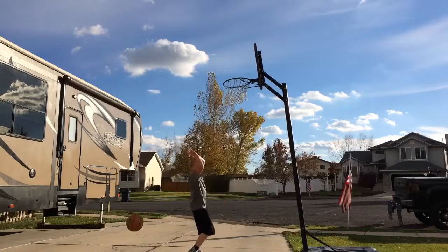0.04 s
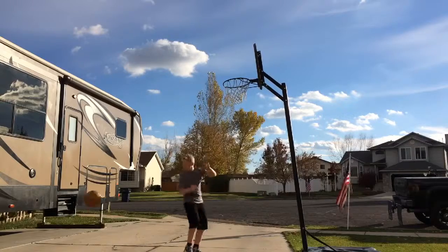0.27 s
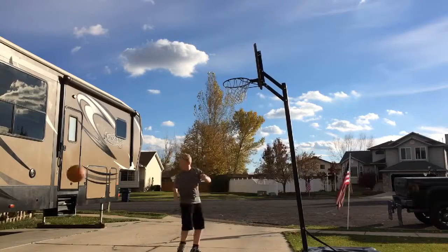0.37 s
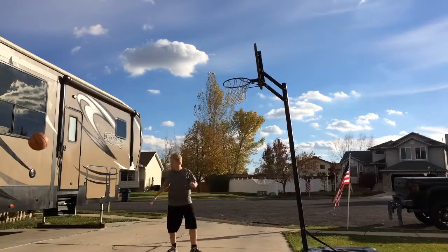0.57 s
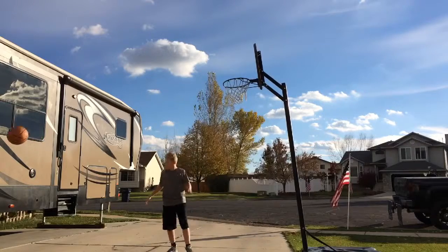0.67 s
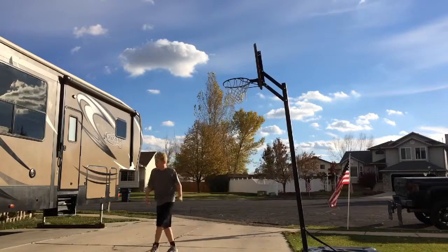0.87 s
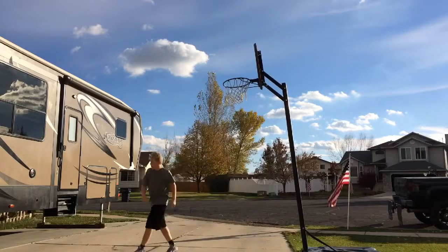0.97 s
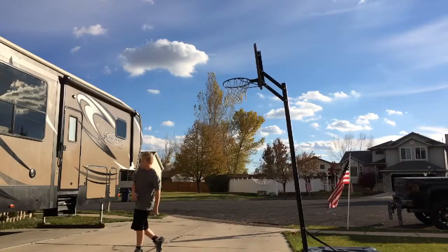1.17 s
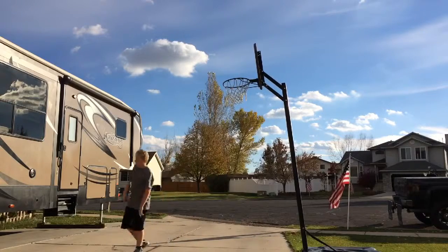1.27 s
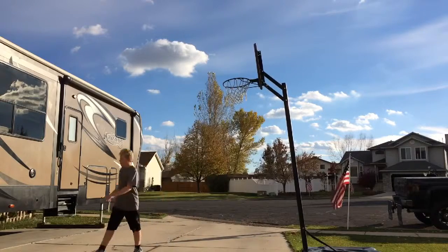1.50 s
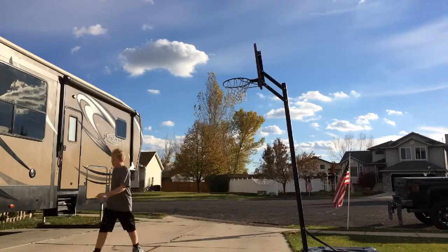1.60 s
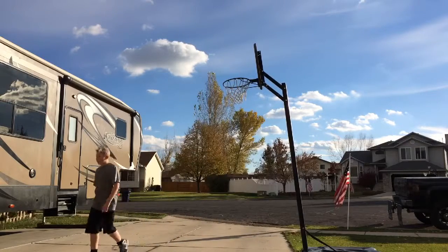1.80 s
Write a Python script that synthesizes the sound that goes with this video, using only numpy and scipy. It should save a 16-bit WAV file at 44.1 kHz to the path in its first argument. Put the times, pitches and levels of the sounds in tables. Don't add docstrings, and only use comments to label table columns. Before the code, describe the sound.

Two sharp, ringing basketball bounces on concrete with street echoes, then a hollow trailer panel rattle

```python
import sys
import numpy as np
from scipy import signal
from scipy.io import wavfile

SR = 44100
rng = np.random.default_rng(int(sys.argv[2]) if len(sys.argv) > 2 else 0)


def to_wav(s):
    ch = np.atleast_2d(s).T
    pcm = np.round(np.clip(ch, -1, 1) * 32767)
    wavfile.write(sys.argv[1], SR, pcm.astype(np.int16))


def how_loud(loudness_db):
    steps = np.asarray(loudness_db, float) / 20
    return 10 ** steps


N = 81585
TIME = np.arange(N) / SR
BANDS_HZ = 24 * 2 ** np.arange(0, 9.4, 1 / 3)


def rms_one(x):
    return x / np.sqrt(np.mean(x ** 2) + 1e-20)


def at_hz(points, hz):
    table = np.array(points)
    return np.interp(np.log(hz), np.log(table[:, 0]), table[:, 1])


def drift(rate_hz):
    r = np.exp(-2 * np.pi * rate_hz / SR)
    noise = rng.standard_normal(N + SR // 4)
    return rms_one(signal.lfilter([1], [1, -2 * r, r * r], noise)[-N:])


def ring(clicks, hz, t60_s):
    r = how_loud(-60 / (t60_s * SR))
    w = 2 * np.pi * hz / SR
    return signal.lfilter([0, np.sin(w)], [1, -2 * r * np.cos(w), r * r], clicks + 1e-18)


def bands(spectrum):
    white = rng.standard_normal((2, N + SR // 2))
    edge = 2 ** (1 / 6)
    rows = []
    for k, hz in enumerate(BANDS_HZ):
        band = signal.butter(2, [hz / edge, hz * edge], "band", fs=SR, output="sos")
        rows.append(how_loud(at_hz(spectrum, hz)) * signal.sosfilt(band, white[k % 2])[-N:])
    out = np.array(rows)
    return out / np.sqrt(np.mean(out.sum(axis=0) ** 2))


def dying(start_s, t60_s):
    return (TIME >= start_s) * how_loud(-60 * np.maximum(TIME - start_s, 0) / t60_s)


def tilt(db_per_octave):
    return how_loud(db_per_octave * np.log2(BANDS_HZ / 4000))[:, None]


def later(x, lag_s):
    return np.interp(TIME - lag_s, TIME, x, left=0)


def clumps():
    flicker = np.repeat([drift(90) for octave in range(10)], repeats=3, axis=0)
    return how_loud(1.6 * flicker[:len(BANDS_HZ)])


def ball():
    # start_s, level_db, thump_hz, trailer_echo_lag_s, trailer_echo_db
    bounces = [
        (.20896, -6.5, 113.1, .0075, 0),
        (1.35044, -8, 127.4, .00675, -2),
    ]
    # pitch_hz, level_db per Hz
    puff_color = [(180, -30), (300, -7), (1110, -23), (1420, -14.5), (2980, -19.5), (7250, -17),
                  (13100, -25.5), (15500, -18)]
    # pitch_hz, level_db per Hz
    scatter_color = [(29, -33), (50, -1), (116, -3), (565, -14.5), (913, -25.5), (1190, -16.5), (1410, -19),
                     (5930, -28), (15500, -43.5)]
    far_wall_lag_s = (.3670, .4432)
    puff = bands(puff_color).sum(axis=0)
    scatter = bands(scatter_color) * clumps()
    wall_band = signal.butter(2, (400, 2200), "band", fs=SR, output="sos")
    echo_cut = signal.butter(1, 177, "high", fs=SR)
    out = np.zeros(N)
    for k, (start_s, level_db, thump_hz, lag_s, echo_db) in enumerate(bounces):
        slap = ball_slap(start_s)
        body = how_loud(level_db) * ball_body(k, start_s, thump_hz, puff)
        trailer_echo = how_loud(echo_db) * later(signal.lfilter(*echo_cut, body), lag_s)
        out += slap + body + trailer_echo + house_echoes(body)
        out += how_loud(level_db) * street_scatter(start_s, scatter)
        far_sound = later(slap + how_loud(5) * body, far_wall_lag_s[k])
        out += how_loud(-31) * signal.sosfilt(wall_band, far_sound)
    return out


def ball_slap(start_s):
    width_s, opposite_lag_s, opposite_share = .000023, .00017, .4
    slap = -how_loud(-3.6) * np.exp(-((TIME - start_s) / width_s) ** 2 / 2)
    return slap - opposite_share * later(slap, opposite_lag_s)


def ball_body(bounce, start_s, thump_hz, puff):
    # pitch_hz, first_bounce_db, second_bounce_db, t60_s
    ball_modes = [(95, -19, -22, 0.041), (169.8, -11, -35, 0.086), (283, -15, -9.5, .04),
                  (410, -18.5, -56, .04), (524, -16.5, -45, .05), (598, -19, -16, 0.07),
                  (800, -24.5, -43, .03), (1046, -30, -30, 0.054), (1158, -24.5, -26.5, .05),
                  (1314, -20, -16.5, .04), (1675, -21, -47, 0.09), (1850, -28.5, -60, 0.042),
                  (2396, -25, -18.5, 0.016), (2777, -25.5, -19.5, 0.021)]
    squash_s = 0.00042
    click = np.zeros(N)
    click[int((start_s + squash_s) * SR)] = 1
    body = how_loud(-3.5) * ring(click, thump_hz, 0.091)
    for row in ball_modes:
        body += how_loud(row[1 + bounce]) * ring(click, row[0], row[3])
    puff_hold_s, puff_t60_s = .004, 0.039
    puff_fall_db = -60 * np.maximum(TIME - start_s - puff_hold_s, 0) / puff_t60_s
    return body + how_loud(-20.5) * puff * (TIME > start_s) * how_loud(puff_fall_db)


def house_echoes(body):
    # lag_s, level_db
    fronts = [
        (.052, -15),
        (.078, -16.5),
        (.101, -19.5),
    ]
    dull = signal.sosfilt(signal.butter(2, 690, fs=SR, output="sos"), body)
    return sum(how_loud(db) * later(dull, lag_s) for lag_s, db in fronts)


def street_scatter(start_s, scatter):
    # pitch_hz, t60_s
    scatter_t60 = [(60, 0.56), (300, 0.36), (600, 0.72), (1000, 0.34), (3000, 0.27), (8000, .25),
                   (15000, 0.24)]
    scatter_db, linger_db, linger_t60_s = -18.5, -47.5, 1.26
    houses_s, houses_fade_s, houses_fall_db = 0.135, 0.013, -8
    low = 1 / (1 + (BANDS_HZ[:, None] / 900) ** 2)
    past = np.clip((TIME - start_s - houses_s) / houses_fade_s, 0, 1)
    fall = dying(start_s, at_hz(scatter_t60, BANDS_HZ)[:, None])
    near = scatter * fall * how_loud(houses_fall_db * past * low)
    linger = scatter * (1 - low) * tilt(-2.5) * dying(start_s, linger_t60_s)
    return (how_loud(scatter_db) * near + how_loud(linger_db) * linger).sum(axis=0)


def trailer():
    # time_s, level_db
    shakes = [
        (1.39, -39),
        (1.398, -43),
        (1.422, -26),
        (1.488, -26.5),
        (1.514, -24.5),
        (1.628, -34.5),
        (1.644, -34),
        (1.85, -42),
    ]
    time_s, level_db = np.transpose(shakes)
    shake_db = np.interp(TIME, time_s, level_db)
    started = np.clip((TIME - time_s[0]) / 0.018, 0, 1)
    peak_db = level_db.max()
    buzz_db = peak_db + 1.07 * (shake_db - peak_db) - 17.5
    return panels(started * how_loud(shake_db - 2.5)) + started * how_loud(buzz_db) * trim_buzz() + trim_knocks()


def panels(shake):
    # pitch_hz, level_db, t60_s
    panel_modes = [(75, -6, 0.12), (102, -3.5, 0.3), (144.7, -2, 0.18), (164.8, -2.5, 0.21), (224, -6, .18),
                   (287, -6, 0.061), (376, -15, .2), (449, -22.5, 0.17), (569, -21, 0.11), (957, -22, 0.13),
                   (1082, -24, 0.12), (1340, -30.5, 0.053)]
    # time_s, level_db
    jolts = [(1.411, -26.5), (1.452, -27), (1.495, -24), (1.52, -29.5), (1.555, -38.5), (1.601, -37),
             (1.644, -31), (1.672, -36), (1.705, -35), (1.738, -40), (1.8, -44)]
    time_s, jolt_db = np.transpose(jolts)
    spread_db = rng.normal(0, 2, (len(time_s), len(panel_modes)))
    tremor, struck = np.zeros(N), np.zeros(N)
    for k, (hz, db, t60_s) in enumerate(panel_modes):
        push = rng.standard_normal(N) * how_loud(4 * drift(30))
        tremor += how_loud(db) * rms_one(ring(push, hz, t60_s))
        clicks = np.zeros(N)
        clicks[(time_s * SR).astype(int)] = how_loud(jolt_db + db + spread_db[:, k]) * (-1) ** k
        struck += ring(clicks, hz, t60_s)
    return shake * rms_one(tremor) + struck


def trim_buzz():
    # pitch_hz, level_db per Hz
    buzz_color = [(120, -45), (200, -10), (231, -4), (479, -21), (575, -11), (769, -14.5), (2510, -22.5),
                  (15500, -69)]
    return bands(buzz_color).sum(axis=0) * how_loud(1.1 * drift(40))


def trim_knocks():
    # start_s, level_db, t60_s, brightness_db_per_octave
    knocks = [
        (1.404, -35.5, 0.14, 4.9),
        (1.424, -37, 0.28, 0.8),
        (1.504, -40, 0.15, 2.3),
        (1.587, -52.5, 0.12, 3),
        (1.599, -55, 0.16, -1),
        (1.636, -70, 0.045, 18),
        (1.695, -59.5, 0.16, 2.5),
    ]
    # pitch_hz, level_db per Hz
    knock_color = [(180, -23), (300, -1.5), (794, -26.5), (1750, -8.5), (2070, -10.5), (2830, -14),
                   (3690, -19.5), (12100, -39.5), (15500, -43)]
    noise = bands(knock_color) * clumps()
    out = np.zeros(N)
    for start_s, db, t60_s, bright in knocks:
        band_t60_s = t60_s * (4000 / BANDS_HZ[:, None]) ** 0.31
        burst = (noise * tilt(bright) * dying(start_s, band_t60_s)).sum(axis=0)
        out += how_loud(db) * burst * np.clip((TIME - start_s) / 0.0017, 0, 1)
    return out


def shoes():
    # start_s, length_s, level_db, brightness_db_per_octave
    scuffs = [
        (.682, .018, -68, 4.5),
        (.675, .07, -64.5, -5.5),
        (1.056, .008, -74, .3),
        (1.056, .035, -69, -8),
        (1.155, .03, -74, -6),
        (1.82, .03, -66, -6),
        (.44, .12, -73, -8),
    ]
    # start_s, level_db
    ticks = [
        (.196, -62),
        (1.338, -58),
    ]
    rise_s, fade_s = .006, .012
    grit = bands([(300, -30), (1500, 0), (15000, -3)]) * how_loud(1.5 * drift(200))
    out = np.zeros(N)
    for start_s, length_s, db, bright in scuffs:
        rise = np.clip((TIME - start_s) / rise_s, 0, 1)
        fade = np.exp(-np.maximum(TIME - start_s - length_s, 0) / fade_s)
        out += how_loud(db) * (grit * tilt(bright)).sum(axis=0) * rise * fade
    for start_s, db in ticks:
        out += how_loud(db) * (grit * tilt(3)).sum(axis=0) * dying(start_s, .015)
    return out


def street():
    # pitch_hz, level_db per Hz
    traffic_color = [(25, -5), (70, 2), (120, 5), (300, -15.5), (720, -9), (1500, -20.5), (2300, -34.5),
                     (15500, -49.5)]
    # time_s, level_db
    gusts = [
        [(0.0, -65), (0.106, -61), (0.388, -57.5), (0.68, -58.5), (0.838, -63.5), (1.098, -63), (1.32, -59)],
    ]
    time_s, db = np.transpose(gusts[0])
    gust_db = np.interp(TIME, time_s, db - db.mean()) + 2.3 * drift(25)
    low = 1 / (1 + (BANDS_HZ[:, None] / 300) ** 2)
    hum = bands(traffic_color) * how_loud(gust_db * low + 0.4 * drift(6.4))
    return how_loud(-52.5) * hum.sum(axis=0)


def scene():
    return (ball() + trailer() + shoes() + street())[None]


def roll_off(x):
    return signal.sosfilt(signal.butter(12, 15920, fs=SR, output="sos"), x)


def record(dry):
    rumble_cut = signal.butter(1, 70, "high", fs=SR, output="sos")
    top_cut = signal.cheby2(10, 40, 15950, fs=SR, output="sos")
    mix = signal.sosfiltfilt(top_cut, signal.sosfiltfilt(rumble_cut, dry))
    return roll_off(mix)


dry = scene()
out = record(dry)
to_wav(out)
```